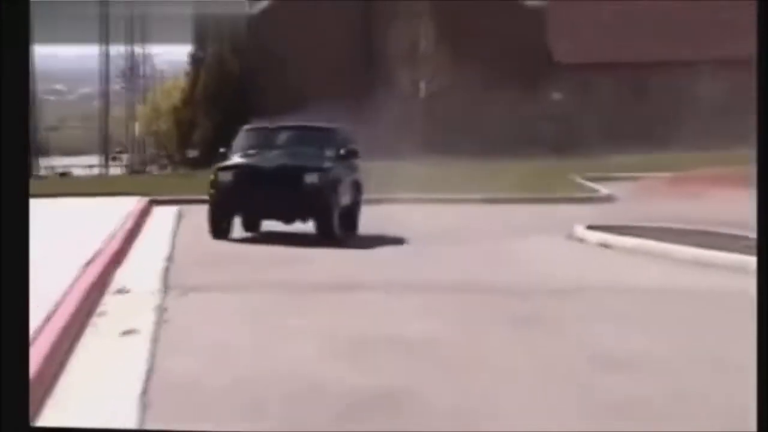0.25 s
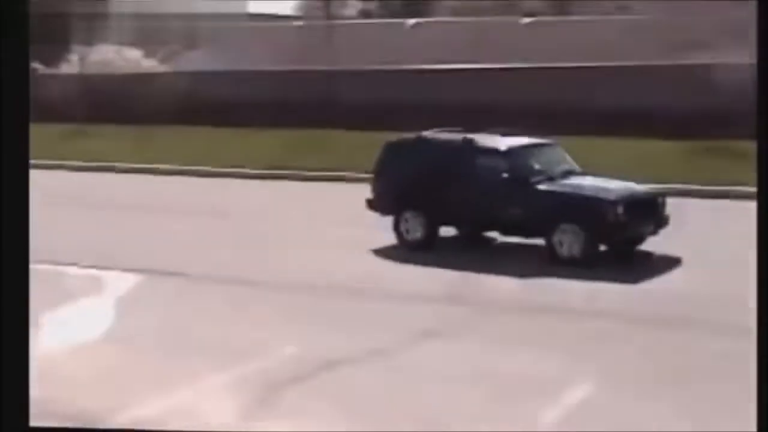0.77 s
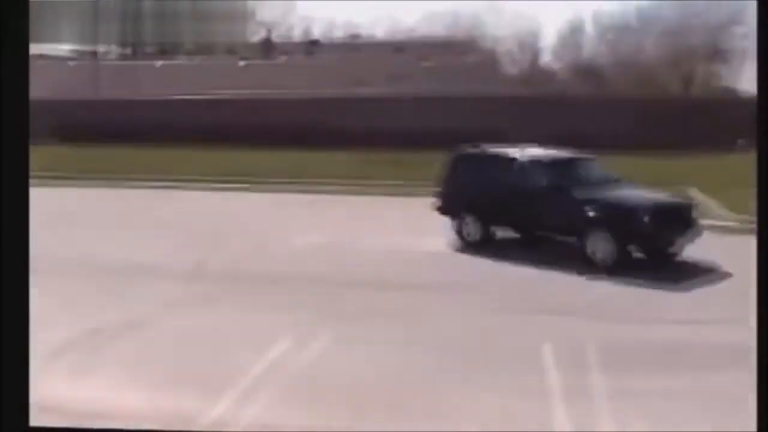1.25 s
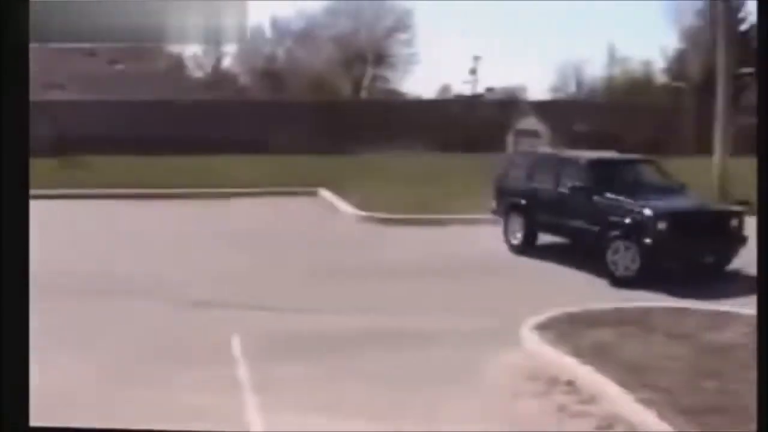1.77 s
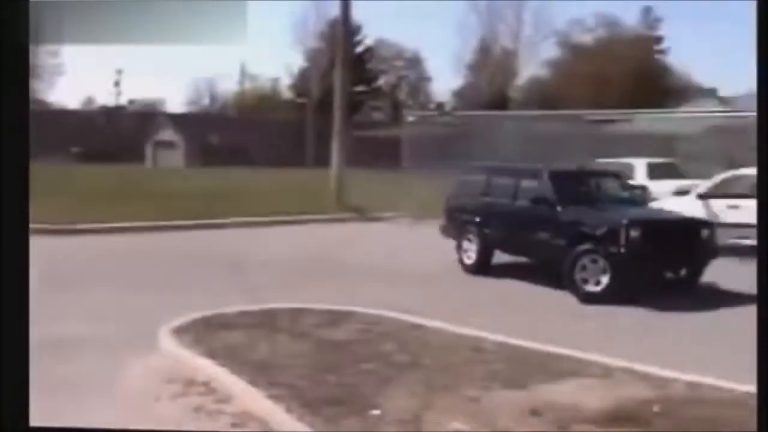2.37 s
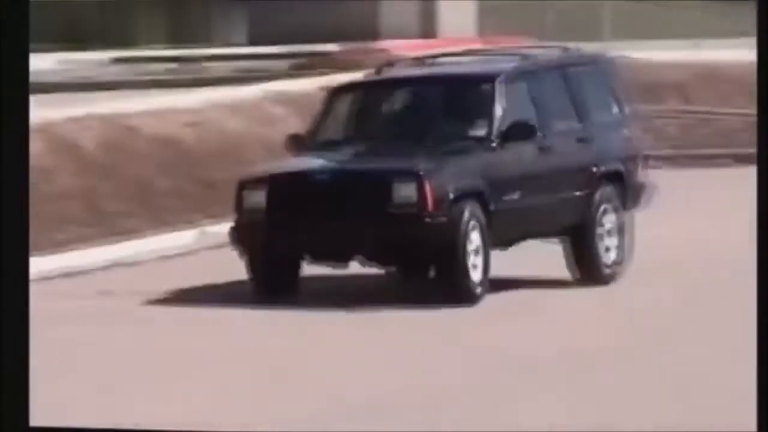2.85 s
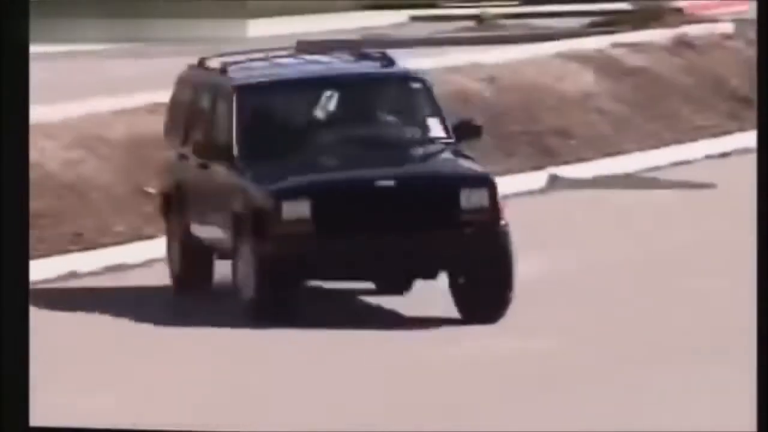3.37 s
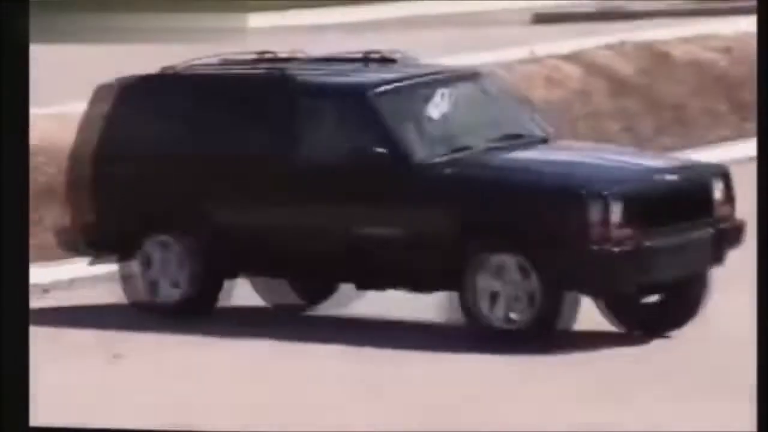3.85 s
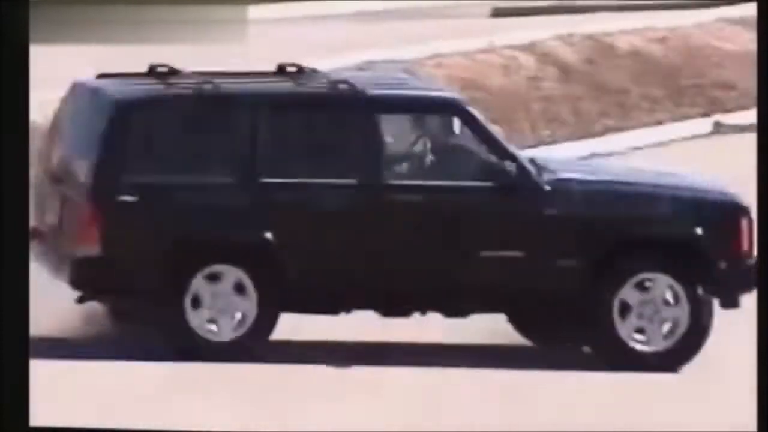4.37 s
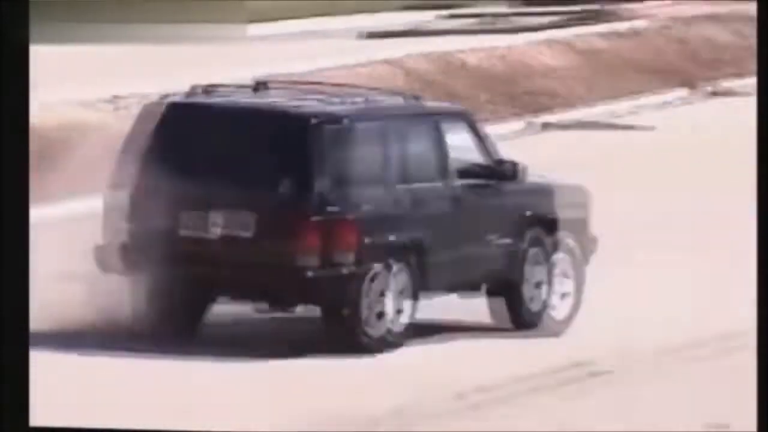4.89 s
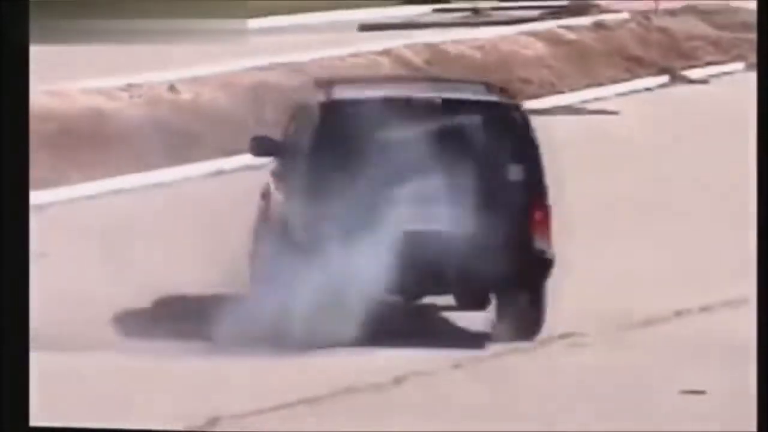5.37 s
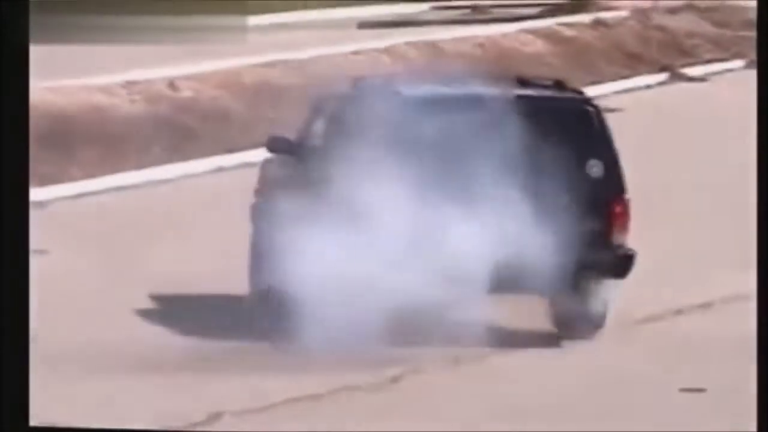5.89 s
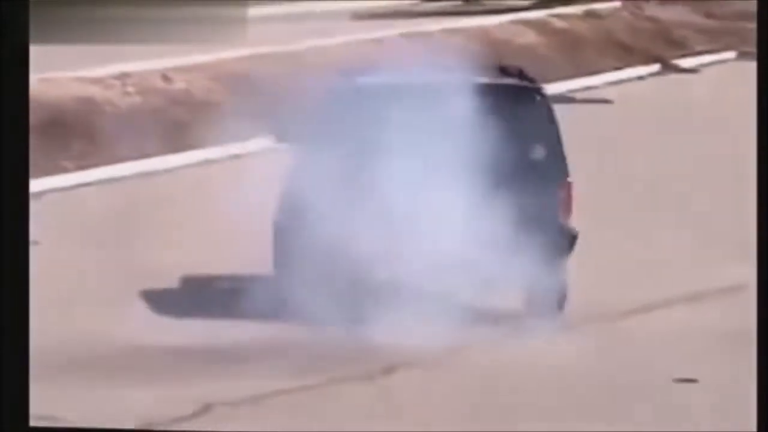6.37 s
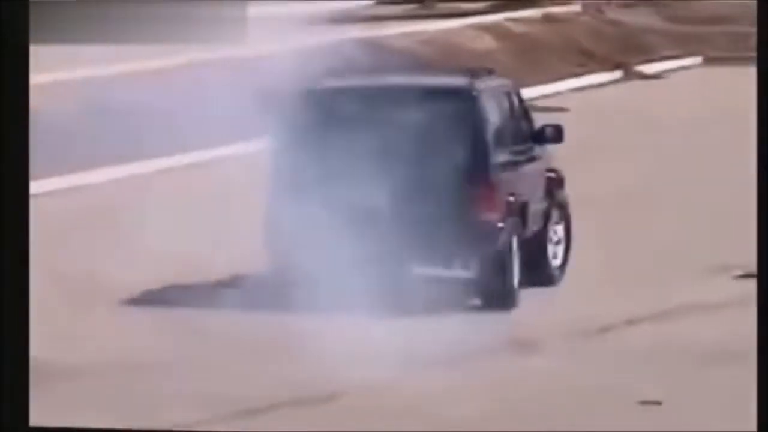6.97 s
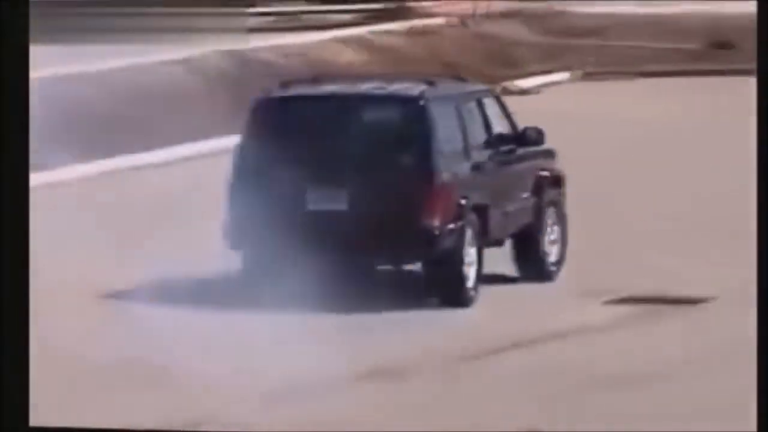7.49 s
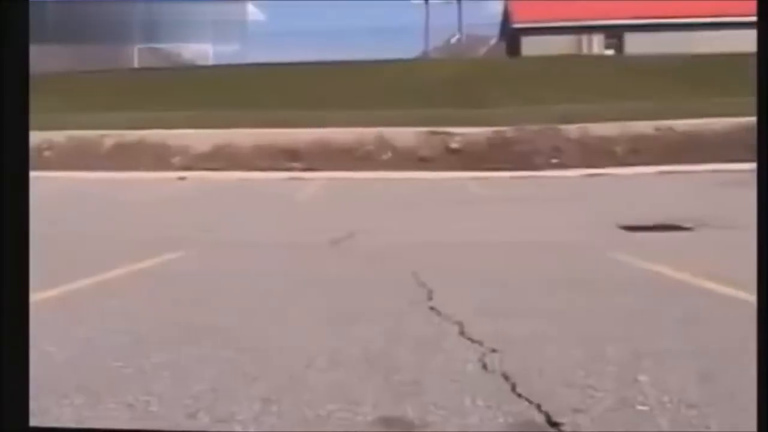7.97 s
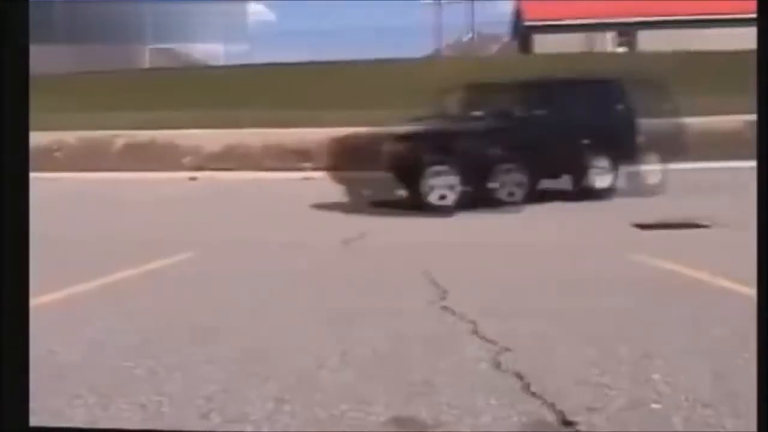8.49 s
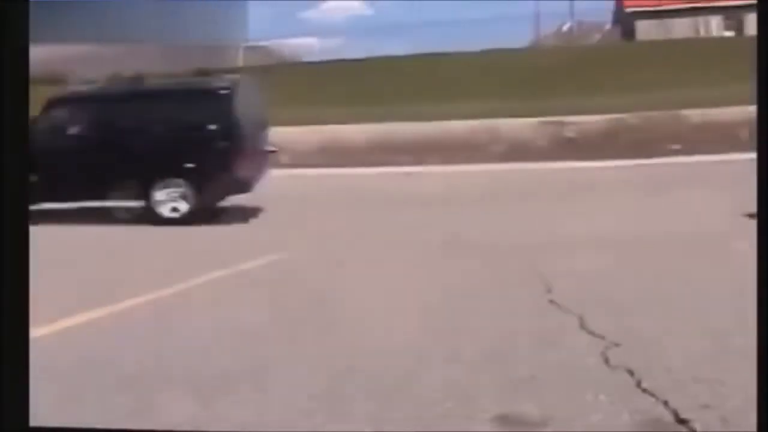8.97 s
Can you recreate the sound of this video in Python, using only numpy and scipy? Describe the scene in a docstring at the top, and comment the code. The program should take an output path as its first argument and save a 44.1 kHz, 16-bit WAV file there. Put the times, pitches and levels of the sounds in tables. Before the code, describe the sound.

Outdoors on an open paved lot, a faint fading tyre squeal and wind buffeting cut suddenly to a loud drifting vehicle: yelps, a wavering mid-pitched squeal, gritty scrub and ticking stones. A hard cut brings a second long slide with two tyres singing together, then a rougher wheelspin with chirps and engine drone. A last cut brings a swerve squeal and a low roar as it passes.

```python
"""Car drifting and spinning on a car park

A sport utility vehicle slides through four scenes joined by hard cuts.
Its tyres sing as gliding stick-slip notes with overtones, break into rough chatter and scrub as shaped noise.
A six-cylinder engine labours below as lines on its firing rate; stones tick and low noise bands thump or hum.
Wind nudges the microphone as low noise, and scattered echoes throw the squeal back from walls around the lot.
"""
import sys
import numpy as np
from scipy import signal
from scipy.fft import rfft, irfft, next_fast_len
from scipy.io import wavfile
from scipy.ndimage import uniform_filter1d, map_coordinates

SR = 44100
rng = np.random.default_rng(int(sys.argv[2]) if len(sys.argv) > 2 else 0)


def store_wav(level_fs):
    """Save 16-bit WAV to argv[1]."""
    pcm = np.round(np.clip(np.atleast_2d(level_fs), -1, 1) * 32767)
    wavfile.write(sys.argv[1], SR, pcm.T.astype(np.int16))


N = 407484
TIME = np.arange(N) / SR

# the four scenes with the sound of free rolling: start/s, scrub/dB, hiss/dB, road rumble/dB
SCENES = [(0, -51.5, -65.5, -53), (.508, -37, -49, -44), (2.788, -48, -62, -50), (7.782, -43.5, -51, -37.5)]
# usual tread motion: slow waver/share of pitch, fast jitter/share of pitch, flutter/dB
SLIP = (.01, .018, 1.4)
# smear of the overtones, as noise against tone: clear overtones, blurred overtones
SMEAR_CLEAR, SMEAR_BLURRED = .3, .85


def amp(db):
    """Decibels to gain."""
    return 10 ** (np.asarray(db) / 20)


def unit(x):
    """Scales to rms 1."""
    return x / np.sqrt(np.mean(abs(x) ** 2) + 1e-20)


def curve(rows, at):
    """The columns of a table, interpolated at the given values of its first column."""
    first, *columns = np.transpose(rows)
    return [np.interp(at, first, column) for column in columns]


def span(rows):
    """The sample times that a table covers, and a gate with 8 ms fades."""
    t = np.arange(rows[0][0] - .006, rows[-1][0] + .006, 1 / SR)
    return t, np.clip(np.minimum(t - t[0], t[-1] - t) / .008, 0, 1)


def add(mix, s, sound):
    """Mixes a sound in at time s, trimming what falls outside."""
    start = round(s * SR)
    skipped = max(-start, 0)
    part = mix[max(start, 0):][:len(sound) - skipped]
    part += sound[skipped:][:len(part)]


def wobble(size, hz):
    """Complex random motion of rms 1, falling off above hz."""
    n = next_fast_len(size)
    white = rng.standard_normal(n) + 1j * rng.standard_normal(n)
    fall = (1 + (np.fft.fftfreq(n, 1 / SR) / hz) ** 4) ** .5
    return unit(np.fft.ifft(white / fall)[:size])


def drift(size, hz):
    """Real random motion of rms 1, falling off above hz."""
    return unit(wobble(size, hz).real)


def noise(colour, side):
    """Stereo noise with a given spectrum: a middle of rms 1, and a share of side noise for width."""
    n = next_fast_len(N)
    f, db = np.transpose(colour)
    shape = amp(np.interp(np.log(np.fft.rfftfreq(n, 1 / SR) + 1), np.log(f), db))
    white = rng.standard_normal((2, n))
    middle, sides = irfft(rfft(white) * shape, n)[:, :N]
    return np.array([middle + side * sides, middle - side * sides]) / middle.std()


def scene_at(t):
    """Which scene is playing at time t."""
    return np.searchsorted([row[0] for row in SCENES[1:]], t)


def swells(rows):
    """Summed power of bell-shaped swells, each cut off with its scene."""
    playing = scene_at(TIME)
    power = 0
    for s, db, half in rows:
        bell = np.exp(-((TIME - s) / half) ** 2)
        power = power + amp(db) ** 2 * bell * (playing == scene_at(s))
    return power


def hold(start, end, fade_s):
    """Attack, hold and release: control times and their level in dB."""
    t = np.arange(start, end, .002)
    gain = np.clip(np.minimum(t - start, end - t) / fade_s, .01, 1)
    return t, 20 * np.log10(gain)


def glide(start, end, first_hz, last_hz, db, fade_s):
    """Pitch and level of a short squeal that slides evenly from one pitch to another."""
    t, fade_db = hold(start, end, fade_s)
    return np.transpose([t, np.linspace(first_hz, last_hz, len(t)), db + fade_db])


def beside(lead, start, end, ratio, under_db):
    """Pitch and level of a tyre that follows the leading one at a steady interval."""
    t, fade_db = hold(start, end, fade_s=.068)
    hz, db = curve(lead, t)
    return np.transpose([t, ratio * hz, db + under_db + fade_db])


def wind():
    """Wind on the microphone: low, wide noise, a faint breeze that swells into gusts."""
    # gusts: peak t/s, level/dB, half length/s
    gusts = [(.02, -41, 0.035), (.31, -40.5, 0.16), (.77, -56, .05), (3.6, -56, 0.21), (4.19, -44.5, 0.12),
             (4.63, -47, 0.085), (9.1, -53, 0.29)]
    # spectrum of the wind: f/Hz, level/dB
    gust_colour = [(15, -4.5), (40, -13.5), (80, 0), (130, -2), (300, -6), (1000, -57)]
    breeze_db = -67.5
    return np.sqrt(amp(breeze_db) ** 2 + swells(gusts)) * noise(gust_colour, side=.62)


def car_park(x):
    """Scattered echoes from kerbs, walls and the bank, different for each ear and dying away evenly in dB."""
    t, t60 = np.arange(SR // 2) / SR, .45
    echo_hits = rng.random((2, len(t))) < 1500 / SR  # 1500 echoes a second
    taps = rng.standard_normal((2, len(t))) * echo_hits * (t > .008) * amp(-60 * t / t60)
    taps /= np.linalg.norm(taps, axis=1, keepdims=True)
    return signal.fftconvolve(x[None], taps, axes=1)[:, :N]


def road():
    """Rolling rumble of the road: low noise that swells as the car leans on its tyres."""
    # swells of rumble: peak t/s, level/dB, half length/s
    rumble_swells = [(.01, -44, 0.16), (.6, -33, 0.43), (2.22, -31.5, 0.15), (3.14, -32.5, 0.41),
                     (4.05, -36, 0.36), (6.45, -40.5, 0.41), (7.79, -30, 0.16), (9.18, -34, 0.25)]
    # spectrum of the rumble: f/Hz, level/dB
    road_colour = [(40, -26), (90, -11.5), (150, -4.5), (280, -1), (420, -4), (580, 6), (750, 2.5),
                   (1200, 0), (4000, -40)]
    rolling_power = amp(np.array(SCENES)[scene_at(TIME), 3]) ** 2
    return np.sqrt(rolling_power + swells(rumble_swells)) * noise(road_colour, side=.05)


def engine():
    """Exhaust lines glide through the pipe's resonances; unequal cylinders add weaker lines, gas blurs the upper."""
    # one table a pull: t/s, firing rate f/Hz, level/dB before the trim
    pulls = [
        [(1.9, 73.1, -63), (2.25, 102.2, -44), (2.78, 165, -35)],
        [(2.79, 155, -30.5), (3.0, 143.4, -44), (3.3, 138.5, -41)],
        [(4.6, 177.5, -41.5), (5.38, 196.6, -38), (5.62, 168.4, -43.5), (5.85, 148.8, -42), (6.1, 130, -37.5),
         (6.55, 114.5, -40.5), (7.15, 112, -36), (7.78, 121.9, -34.5)],
        [(7.78, 165.4, -29), (8.4, 157.3, -43), (8.9, 138.4, -36), (9.24, 133.4, -39)],
    ]
    # resonances of the exhaust pipe: f/Hz, level/dB
    pipe = [(50, -24), (85, -21.5), (115, 1), (150, -12), (190, -14), (230, -3), (285, 2), (330, -1.5),
            (380, -8), (480, -26), (570, -10), (750, -20.5)]
    # exhaust lines as multiples of the firing rate [ratio]
    multiples = (2 / 3, 1, 4 / 3, 2, 2.5, 3, 4, 5)
    # their levels, one a line: level/dB
    exhaust_db = [-15, 0, -6.5, -5.5, -14, -13, -5, -3.5]
    puff_width_hz, puff_db = 30, -9  # rushing gas around each upper line, level against the line
    trim_db = -2.5  # on the lines alone
    out = np.zeros(N)
    for rows in pulls:
        t, gate = span(rows)
        n = len(t)
        hz, db = curve(rows, t)
        # no two firings are evenly spaced
        uneven = 1 + .009 * drift(n, 15) + .028 * drift(n, 90)
        phase = 2 * np.pi * np.cumsum(hz * uneven) / SR
        for k, level in zip(multiples, exhaust_db):
            unrest_db = 1.3 if k == 1 else 2.6  # the firing note is steadier than the others
            line_db = db + level + curve(pipe, k * hz)[0] + unrest_db * drift(n, 14)
            line = np.cos(k * phase + 2 * np.pi * rng.random())
            add(out, t[0], gate * amp(line_db + trim_db) * line)
            if k > 1:
                puffs = wobble(n, puff_width_hz) * np.exp(1j * k * phase)
                add(out, t[0], gate * amp(line_db + puff_db) * puffs.real)
    return out


def stones():
    """Stones flicked by the tread: short, fast-dying bursts of noise around one frequency."""
    # ticks: t/s, level/dB before a 4 dB cut, centre f/Hz
    ticks = [(.548, -37, 6500), (.618, -31, 7000), (.686, -39, 6500), (.761, -23, 3500), (1.029, -27, 3700),
             (1.22, -33, 6000), (3.49, -42, 6500), (3.53, -39, 6500), (4.11, -42, 7000), (7.707, -28, 1800)]
    out = np.zeros(N)
    t = np.arange(SR // 20) / SR
    for s, db, hz in ticks:
        burst = (wobble(len(t), hz / 4) * np.exp(2j * np.pi * hz * t)).real
        add(out, s, amp(db - 4) * np.exp(-t / .0072) * burst)
    return out


def thumps_and_hum():
    """Low noise bands that swell and fade softly: dull thumps, and one long soft hum near 197 Hz."""
    # bands: start t/s, level/dB, centre f/Hz, length/s
    low_bands = [(0.018, -35, 249, 0.025), (.265, -43, 146, 0.064), (0.34, -39.5, 223, 0.095),
                 (1.877, -59, 197.4, .4), (3.767, -43, 385, 0.055)]
    out = np.zeros(N)
    for s, db, hz, length in low_bands:
        t = np.arange(0, length, 1 / SR)
        band = (wobble(len(t), hz / 2) * np.exp(2j * np.pi * hz * t)).real
        add(out, s, amp(db) * unit(np.hanning(len(t)) * band))
    return out


def howl():
    """A broad, low roar of tyres dragged sideways as the car swings past: coloured noise that rises and holds."""
    # spectrum of the roar: f/Hz, level/dB
    howl_colour = [(120, -59), (200, -53), (296, -2), (336, -20), (373, -2.5), (437, -7.5), (575, 4.5),
                   (646, -5.5), (749, 0.5), (807, -3.5), (1080, -5), (1270, -15), (2500, -21), (3250, -39),
                   (5500, -120)]
    start_s, rise_s, held_db = 8.885, .16, -21.5
    rise = np.clip((TIME - start_s) / rise_s, 0, 1)
    return amp(held_db) * rise * noise(howl_colour, side=.07)


def squeaks(count=900):
    """Single tread blocks catch for a moment and give short gliding squeaks; rms 1."""
    out = np.zeros(N)
    for when, pitch, length, slope, size in rng.random((count, 5)):
        u = np.linspace(0, 1, int(SR * (.025 + .08 * length)))
        vibrato = .012 * np.sin(2 * np.pi * (2 * u + size))
        hz = 1200 * (3000 / 1200) ** pitch * (1 + .14 * (slope - .5) * u + vibrato)
        level = amp(10 * size - 11 * pitch ** 2)  # higher squeaks are weaker
        add(out, when * N / SR, level * np.sin(np.pi * u) * np.sin(2 * np.pi * np.cumsum(hz) / SR))
    return unit(out)


def grit():
    """Coarse stones tear at the rubber: a gain that jumps with each one and dies away; rms 1."""
    stones_per_s, jump, fade_s = 70, .3, .003
    size = np.minimum(rng.exponential(1, N), 4) * (rng.random(N) < stones_per_s / SR)
    return unit(1 + signal.lfilter([jump], [1, -np.exp(-1 / (fade_s * SR))], size))


def scrub():
    """Rubber tears sideways over the stones in uneven bursts: a squeaky rasp with a harsh bite, and a gritty hiss."""
    # one table a slide: t/s, scrub level/dB, grit hiss level/dB, both before the bursts
    slides = [
        [(.68, -33.5, -40), (.74, -24.5, -31), (1.0, -28, -32.5), (1.22, -34.5, -39.5), (1.7, -29, -45.5),
         (2.2, -27, -40), (2.78, -23, -43)],
        [(3.035, -36, -58), (3.08, -26.5, -50), (3.41, -24.5, -45), (3.8, -30.5, -49.5), (4.25, -34, -45),
         (4.6, -41, -45), (5.45, -28.5, -40), (5.83, -35, -52), (6.22, -36, -47.5), (6.45, -45, -58),
         (7.1, -56, -65)],
        [(7.785, -25, -49), (8.2, -25.5, -46), (8.57, -29.5, -42.5), (8.87, -41, -50), (9.24, -39, -40.5)],
    ]
    # spectrum of the rasp, one table a slide: f/Hz, level/dB
    rasp_colours = [
        [(200, -27), (430, -14), (600, 11.5), (950, 9.5), (1250, 7.5), (1600, 4.5), (2200, 5), (3300, -8.5),
         (4200, -9.5), (6000, -21), (10000, -66)],
        [(200, -20), (430, -20.5), (620, 8), (900, 12), (1250, 4), (1550, 0.5), (1850, 6.5), (2150, -0.5),
         (2400, 4), (2700, -2), (3080, -3.5), (3500, -4.5), (4200, -12.5), (6000, -20.5), (10000, -56.5)],
        [(200, -35), (430, -8), (580, 4), (760, 12.5), (980, 9.5), (1230, 5), (1500, 12), (2000, 8.5),
         (2400, -1), (3300, -3), (4200, -4.5), (6000, -16.5), (10000, -63)],
    ]
    # strength of the squeaks against the rasp, one a slide [ratio]
    squeaky = (.65, .45, .3)
    # spectrum of the harsh bite: f/Hz, level/dB
    bite_colour = [(1700, -26), (2400, 0), (3200, -8.5), (4000, -24), (9000, -58)]
    # sprays of grit from the spinning tyre: peak t/s, level/dB, half length/s
    sprays = [(.8, -26, 0.024), (3.3, -49.5, 0.3), (5.39, -34, 0.096)]
    # spectrum of the hiss: f/Hz, level/dB
    hiss_colour = [(1500, -27), (3000, 9), (4300, 1), (5800, -1.5), (7000, -8.5), (7600, -6), (8200, -14.5),
                   (9800, -13.5), (11000, -39.5)]
    bite_db, pan_db = 14, -1.5  # pan: left minus right
    playing = scene_at(TIME)
    rasp_power, hiss_power = amp(np.array(SCENES)[playing, 1:3].T) ** 2
    for rows in slides:
        t, gate = span(rows)
        rasp_db, hiss_db = curve(rows, t)
        add(rasp_power, t[0], (gate * amp(rasp_db)) ** 2)
        add(hiss_power, t[0], (gate * amp(hiss_db)) ** 2)
    bursts = unit(amp(1.2 * drift(N, 8.8) + .55 * drift(N, 310)))
    # squeaks die away when the tyres roll freely
    grip = np.clip((10 * np.log10(rasp_power) + 52) / 16, 0, 1)
    slide = np.maximum(playing - 1, 0)
    rubber = np.choose(slide, [noise(colour, side=.18) for colour in rasp_colours])
    tearing = rubber + np.array(squeaky)[slide] * grip * squeaks()
    # the bite follows power, so it grows twice as fast in dB as the rasp
    bite = amp(bite_db) * rasp_power * noise(bite_colour, side=.12)
    rasp = np.sqrt(rasp_power) * tearing + bite
    hiss = np.sqrt(hiss_power + swells(sprays)) * noise(hiss_colour, side=.067)
    return bursts * grit() * (rasp * amp([[pan_db / 2], [-pan_db / 2]]) + hiss)


def chatter_share(t):
    """A tyre chatters as it lets go, locks into a note, and breaks up again as the slide ends."""
    # stretches of one clear note: start t/s, end t/s, power left as chatter/share 0-1
    locks = [(1.03, 1.76, .05), (3.45, 5.3, .15), (5.62, 5.7, .3), (8.19, 8.56, .07)]
    free_share, lock_s = .55, .18  # chatter outside them, time to lock or unlock
    share = free_share
    for start, end, locked in locks:
        lock = np.clip(1 + np.minimum(t - start, end - t) / lock_s, 0, 1)
        share = share + (locked - free_share) * lock
    return share


def squeal(rows, overtones, waver, jitter, flutter_db, chatter_hz, chatter_lift, smear, rough_scale=1):
    """Tread blocks stick and slip: locked together they sing one wavering note, out of step they chatter around it."""
    dulling = .2  # dB an overtone loses for each dB that the note falls
    flicker_db, flicker_hz = 2.5, 12  # overtones come and go
    t, gate = span(rows)
    n = len(t)
    hz, db = curve(rows, t)
    rough = np.clip(rough_scale * chatter_share(t), 0, 1)
    # the pitch wavers with wheel load and jitters with the grain of the road
    unsteady = 1 + waver * drift(n, 20.7) + jitter * drift(n, 344)
    phase = 2 * np.pi * np.cumsum(hz * unsteady) / SR
    locked = unit(amp(flutter_db * drift(n, 30)))
    chatter = wobble(n, chatter_hz) * np.exp(1j * chatter_lift * phase)
    tread = (np.sqrt(1 - rough) * locked + np.sqrt(rough) * chatter) * np.exp(1j * phase)
    # each slip is abrupt, which adds overtones; blocks that let go early or late smear them
    wave = tread.real
    eased_db = dulling * (db - np.percentile(db, 75))
    for k, level in enumerate(overtones, 2):
        strength = amp(level + eased_db) * unit(amp(flicker_db * drift(n, flicker_hz)))
        overtone = np.exp(1j * k * np.angle(tread)) * unit(1 + smear * wobble(n, 140))
        wave = wave + strength * abs(tread) * overtone.real
    out = np.zeros(N)
    add(out, t[0], np.sqrt(2) * gate * amp(db) * wave)
    return out


def short_squeals():
    """Brief gliding notes: yelps as a tyre lets go, chirps of tread ribs, thin reedy squeals and rough rings."""
    # as a tyre first lets go: start t/s, end t/s, first f/Hz, last f/Hz, level/dB, fade/s
    yelps = [(0.708, .742, 1040, 1002, -11.5, 0.0089), (.731, .76, 1204, 1080, -10.5, .008),
             (3.07, 3.129, 859, 836, -13, 0.031)]
    # single tread ribs catching: start t/s, end t/s, first f/Hz, last f/Hz, level/dB
    chirps = [(0.795, 0.915, 960, 890, -23), (.985, 1.045, 887, 742, -12), (1.122, 1.152, 910, 910, -15.5),
              (1.471, 1.563, 639, 560, -17), (2.262, 2.388, 612.5, 696, -29.5),
              (2.325, 2.423, 620, 660, -34), (2.391, 2.476, 723, 680, -23.5), (2.426, 2.534, 657, 644, -23),
              (2.553, 2.686, 639, 700, -23), (2.671, 2.77, 649, 707, -26), (3.103, 3.139, 905, 915, -25),
              (3.784, 3.87, 688, 696, -14), (6.33, 6.406, 800, 685, -39), (6.45, 6.551, 707, 800, -40),
              (6.623, 6.72, 1032, 1090, -38), (7.801, 7.869, 637, 540, -26), (7.842, 7.891, 997, 1115, -24),
              (7.901, 7.98, 972, 942, -27), (7.937, 8.031, 739, 727, -30), (8.03, 8.153, 809, 709, -28.5),
              (8.051, 8.106, 970, 955, -22), (8.698, 8.767, 863, 905, -25), (8.762, 8.816, 691, 714, -25)]
    # thin squeals with a strong octave: start t/s, end t/s, first f/Hz, last f/Hz, level/dB
    reedy = [(1.783, 1.872, 755, 673, -23.5), (1.85, 2.002, 665.4, 735, -26.5),
             (1.924, 2.151, 680, 738, -30), (2.251, 2.789, 653, 681.7, -35), (7.87, 8.152, 742, 732.4, -31),
             (8.625, 8.8, 736, 740, -28), (8.64, 8.791, 805, 797, -31)]
    # rough, mostly higher notes as the tread is loaded hardest: start t/s, end t/s, first f/Hz, last f/Hz, level/dB
    rings = [(0.763, 0.872, 1180, 1090, -25), (0.931, 1.2, 1133, 1080, -30.5),
             (1.808, 2.137, 1413, 1454, -28.5), (2.279, 2.781, 1290, 1340, -38),
             (2.4, 2.78, 1900, 2020, -33), (3.13, 3.322, 2400, 2360, -37), (3.13, 3.448, 3040, 3080, -36.5),
             (3.45, 3.52, 2880, 2850, -37), (3.278, 3.58, 923, 880, -28.5), (3.566, 3.763, 883, 800, -24.5),
             (3.354, 3.42, 1840, 1820, -27), (3.442, 3.634, 1910, 1830, -29.5),
             (3.62, 3.76, 1700, 1500, -29), (3.759, 4.721, 1280, 1311, -33),
             (3.897, 4.755, 1362, 1488, -36), (3.95, 4.4, 1977, 2070, -36.5),
             (4.893, 5.036, 1517, 1375, -32.5), (5.549, 5.803, 1950, 1926, -36),
             (7.878, 8.142, 1479, 1460, -32.5), (8.128, 8.289, 1720, 1600, -24.5),
             (8.387, 8.562, 2350, 2280, -37), (8.439, 8.619, 1540, 1510, -35)]
    song = np.zeros(N)
    for row in yelps:
        song += squeal(glide(*row), [-20, -26], *SLIP, chatter_hz=110, chatter_lift=.03,
                       smear=SMEAR_BLURRED, rough_scale=.2)
    for row in chirps:
        song += squeal(glide(*row, fade_s=.017), [-14, -24], *SLIP, chatter_hz=50, chatter_lift=0,
                       smear=SMEAR_CLEAR, rough_scale=0)
    for row in reedy:
        song += squeal(glide(*row, fade_s=.029), [1, -11], waver=.016, jitter=.023, flutter_db=1,
                       chatter_hz=40, chatter_lift=0, smear=SMEAR_CLEAR, rough_scale=.3)
    for row in rings:
        song += squeal(glide(*row, fade_s=.05), [], *SLIP, chatter_hz=32, chatter_lift=0,
                       smear=0, rough_scale=2)
    return song


def snatches(length=.01217):
    """Sharp chirps: a few loud cycles as the spinning tread grabs at the road and lets go."""
    # chirps: centre t/s, f/Hz, level/dB
    snatch_rows = [(5.573, 940, -20), (5.742, 975, -16), (5.778, 965, -13), (5.8, 940, -16),
                   (5.856, 880, -20), (5.921, 900, -21), (6.014, 897, -14), (6.08, 836, -17)]
    out = np.zeros(N)
    t = np.arange(0, length, 1 / SR)
    for s, hz, db in snatch_rows:
        cycles = np.hanning(len(t)) * np.sin(2 * np.pi * hz * t)
        add(out, s - length / 2, np.sqrt(2) * amp(db) * cycles)
    return out


def grabs(rows):
    """The spinning tread grabs and lets go at uneven intervals, each time for a few cycles near the tyre's pitch."""
    gap_s, grab_s = .01, .012  # mean gap, length of a grab
    spread = .11  # of the pitch, as a share
    level_db, uneven_db = 3.5, 4  # against the note
    out = np.zeros(N)
    t = np.arange(0, grab_s, 1 / SR)
    times = np.arange(rows[0][0], rows[-1][0], gap_s)
    chances = rng.uniform(-.972, 1, (len(times), 4))
    for s, hz, db, (late, sharp, size, turn) in zip(times, *curve(rows, times), chances):
        cycles = np.sin(2 * np.pi * hz * (1 + spread * sharp) * t + np.pi * turn)
        level = amp(db + level_db + uneven_db * size)
        add(out, s + late * gap_s / 2, level * np.hanning(len(t)) * cycles)
    return out


def spinning_tyre():
    """A spinning tyre: a rough note, the grabs of its tread, and a lower, ragged squeal beneath."""
    # the spinning tyre's note: t/s, f/Hz, level/dB
    burnout = [(5.37, 890, -35), (5.46, 984.5, -26), (5.54, 950, -29.5), (5.63, 955, -21.5),
               (5.69, 945, -21), (5.72, 962, -28.5), (5.76, 950, -22), (5.85, 911.5, -30), (5.97, 927, -27),
               (6.08, 871.5, -28), (6.16, 888, -30), (6.26, 926, -30), (6.39, 834, -42), (6.57, 913, -33.5),
               (6.7, 985, -38), (6.85, 974, -40.5), (6.98, 953, -61)]
    # the ragged squeal: t/s, f/Hz, level/dB
    judder = [(5.45, 799, -44), (5.8, 784, -30.5), (6.08, 740, -27.5), (6.3, 733, -40),
              (6.45, 686.7, -35.5), (6.75, 739.6, -43), (6.95, 702, -69)]
    song = grabs(burnout)
    song += squeal(burnout, [-17, -27], waver=.018, jitter=.02, flutter_db=2,
                   chatter_hz=70, chatter_lift=0, smear=SMEAR_BLURRED, rough_scale=.8)
    song += squeal(judder, [-22], *SLIP, chatter_hz=98, chatter_lift=0, smear=SMEAR_BLURRED, rough_scale=1.7)
    return song


def sliding_tyres():
    """The long squeals: the loudest sliding tyre of each slide, and the tyres that sing beside it."""
    # the loudest tyre, one table a slide: t/s, f/Hz, level/dB
    fading = [(0, 673, -27.5), (.03, 702, -39), (.22, 746, -43), (.5, 682, -59)]
    drifting = [(.78, 790, -22), (.83, 785, -15.5), (.87, 735, -22.5), (.95, 752, -13), (1.0, 765, -18.5),
                (1.05, 760, -13), (1.125, 757, -12), (1.152, 725, -21.5), (1.17, 745, -15),
                (1.2, 750, -18.5), (1.42, 715, -17), (1.52, 652, -17), (1.58, 602, -17.5), (1.69, 570, -14),
                (1.76, 590, -18), (1.88, 582, -22), (2.1, 615, -21.5), (2.22, 590, -27), (2.45, 650, -25),
                (2.777, 685, -39)]
    donut = [(3.13, 610, -30), (3.27, 650, -24.5), (3.33, 679, -21), (3.42, 668, -17.5), (3.56, 652.3, -15),
             (3.7, 615, -23), (3.8, 627.3, -26.5), (3.87, 629.7, -11.5), (3.96, 638.2, -15),
             (4.04, 665, -16), (4.12, 726.4, -15.5), (4.28, 701, -12.5), (4.36, 733, -19),
             (4.55, 736.7, -17.5), (4.72, 760.3, -18), (4.8, 746.4, -22), (5.09, 787, -23),
             (5.25, 775, -31.5)]
    swerve = [(7.785, 820, -39), (7.9, 760, -32), (8.12, 830, -36.5), (8.16, 850, -21), (8.25, 806, -23),
              (8.33, 786, -19.5), (8.4, 780, -17.5), (8.47, 772, -20), (8.54, 757, -18), (8.61, 730, -21),
              (8.74, 735, -28.5), (8.83, 810, -27.5), (8.89, 790, -39)]
    # the inner tyre of the donut sings at its own pitch: t/s, f/Hz, level/dB
    inner = [(3.38, 727.4, -28), (3.44, 721.2, -22), (3.6, 684.3, -21.5), (3.74, 665, -15),
             (3.775, 572.6, -13), (3.83, 548, -22.5), (3.87, 561.9, -36), (3.95, 672.7, -16),
             (4.1, 640, -20), (4.44, 630.5, -22.5), (4.7, 641.6, -24), (4.96, 680, -21), (5.03, 634.5, -22),
             (5.22, 642, -24), (5.3, 735, -26), (5.37, 784, -26), (5.42, 925, -42)]
    # tyres that follow the drifting one: start t/s, end t/s, pitch/ratio, level against it/dB
    followers = [(0.767, 1.499, 0.88, -13.5), (0.782, 1.469, 1.18, -8), (1.555, 2.199, 1.09, -15)]
    song = squeal(fading, [-10, -20], *SLIP, chatter_hz=68, chatter_lift=.02, smear=SMEAR_BLURRED)
    song += squeal(drifting, [-10.5, -23, -33], waver=.008, jitter=.012, flutter_db=1.4,
                   chatter_hz=72, chatter_lift=.06, smear=SMEAR_CLEAR)
    for row in followers:
        song += squeal(beside(drifting, *row), [-12, -22], *SLIP, chatter_hz=61, chatter_lift=.03,
                       smear=SMEAR_CLEAR, rough_scale=13)
    song += squeal(donut, [-18, -25, -34], *SLIP, chatter_hz=64, chatter_lift=-.03, smear=SMEAR_BLURRED)
    song += squeal(inner, [-13, -18, -28], *SLIP, chatter_hz=51, chatter_lift=.03, smear=SMEAR_BLURRED)
    song += squeal(swerve, [-11.5, -18, -28], waver=.007, jitter=.013, flutter_db=1.6,
                   chatter_hz=100, chatter_lift=.05, smear=SMEAR_CLEAR)
    return song


def tyres():
    """All the singing tyres; the wedge between tread and road is a horn that passes little below its cut-off."""
    horn_hz = 535
    song = short_squeals() + spinning_tyre() + sliding_tyres()
    return signal.sosfilt(signal.butter(5, horn_hz, "high", fs=SR, output="sos"), song)


def bearing():
    """In each scene the car crosses the view evenly: left minus right in dB, and the lag of the left ear in ms."""
    # one row a scene: left minus right at the start/dB, the same at the end/dB, left lag at the start/ms
    crossings = [(1.3, .7, 0), (1.1, -.2, 0), (1.1, 1.8, 0), (-1.7, 1.4, .05)]
    playing, start = scene_at(TIME), np.array(SCENES)[:, 0]
    first_db, last_db, lag_ms = np.array(crossings)[playing].T
    length = np.diff(start, append=N / SR)
    way = (TIME - start[playing]) / length[playing]
    return first_db * (1 - way) + last_db * way, lag_ms * (1 - way)


def scene():
    """The car and its echoes move across the stereo image; wind stays on the microphone."""
    engine_pan_db, echo_db = 1.2, -16.5  # pan: left minus right
    song = tyres() + snatches()
    car = song + amp(echo_db) * car_park(song)
    car = car + scrub() + road() + howl() + stones() + thumps_and_hum()
    left, right = car + engine() * amp([[engine_pan_db / 2], [-engine_pan_db / 2]])
    pan_db, lag_ms = bearing()
    left = map_coordinates(left, [(TIME - lag_ms / 1000) * SR], order=3, mode="nearest")
    return np.array([left, right]) * amp([pan_db / 2, -pan_db / 2]) + wind()


def record(dry):
    """A fast limiter reins in the loudest squeals; peaks are rounded off and the top octave is cut."""
    threshold_db, recovery_db_per_s, edge_hz = -13.5, 90, 10100
    power = abs(uniform_filter1d((dry ** 2).mean(0), size=180))
    power_db = 10 * np.log10(power + 1e-12)
    fall = TIME * recovery_db_per_s
    peak_db = np.maximum.accumulate(power_db + fall) - fall
    over_db = np.maximum(peak_db - threshold_db, 0)
    held = dry / amp(.8 * uniform_filter1d(over_db, size=90))  # takes off 0.8 dB for each dB over
    soft = held / (1 + (held / .45) ** 6) ** (1 / 6)
    low_pass = signal.firwin(401, edge_hz, window=("kaiser", 8), fs=SR)
    return signal.oaconvolve(soft, low_pass[None], "same")


dry = scene()
out = record(dry)
store_wav(out)
```